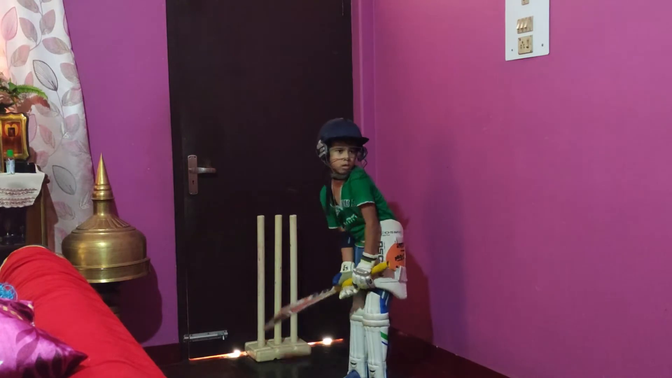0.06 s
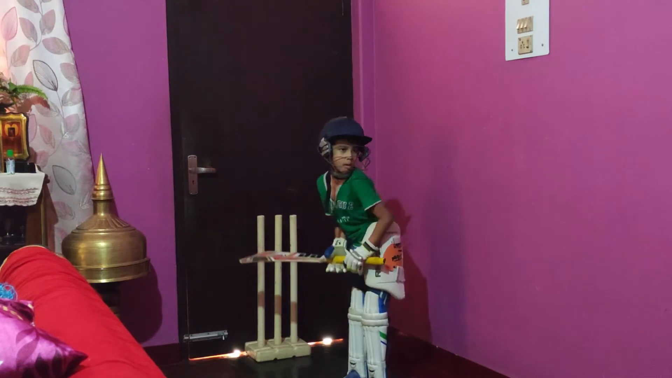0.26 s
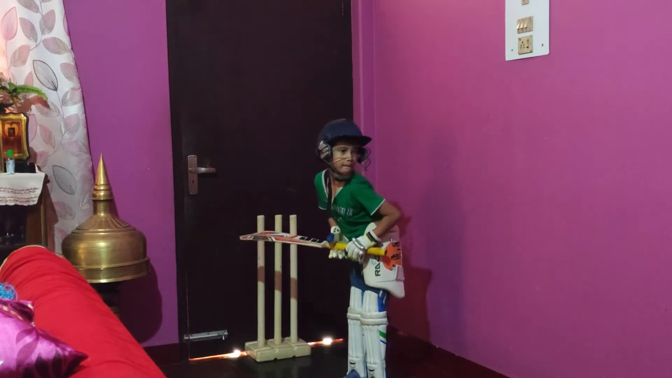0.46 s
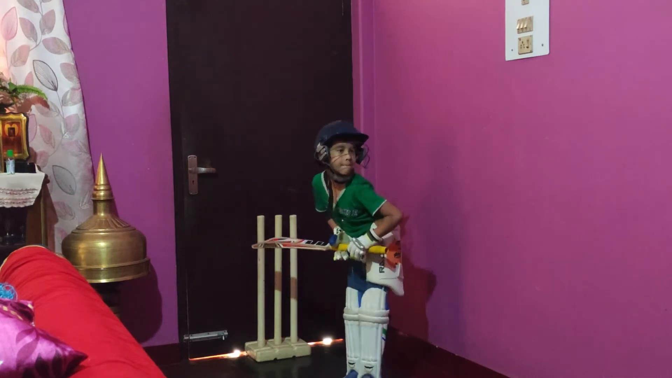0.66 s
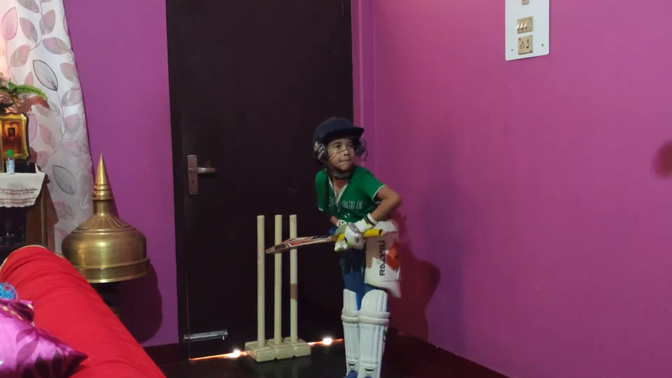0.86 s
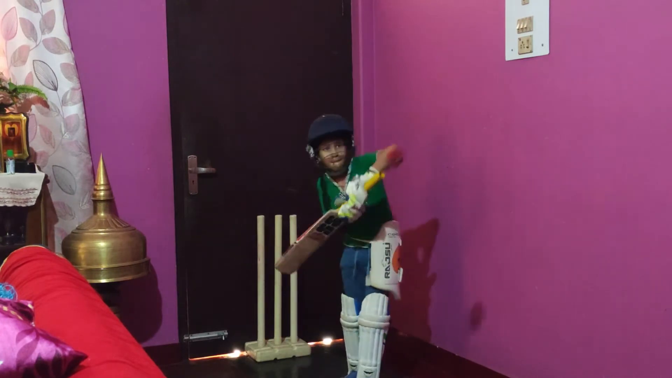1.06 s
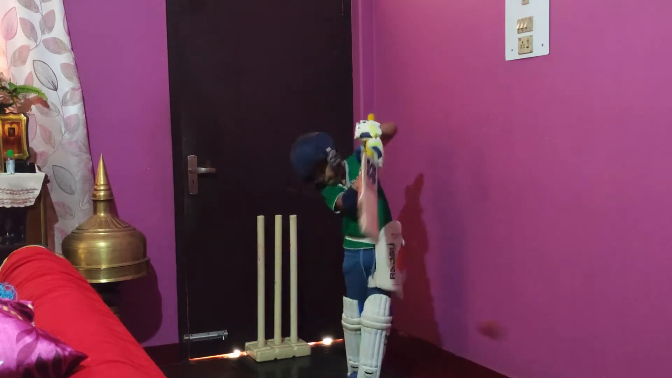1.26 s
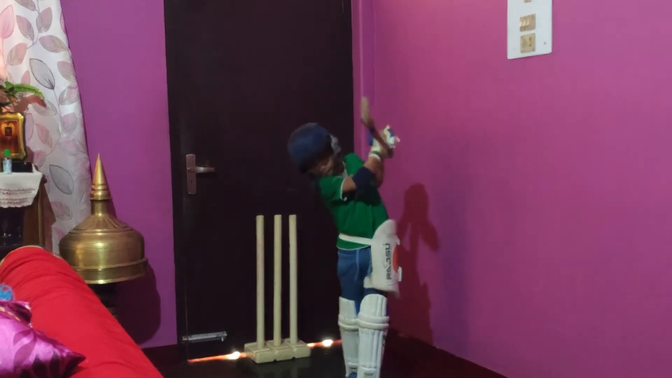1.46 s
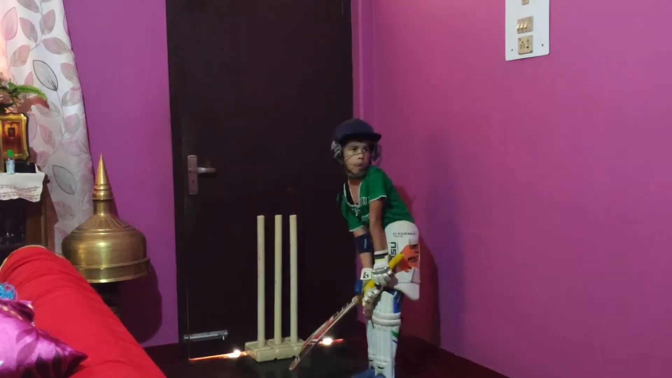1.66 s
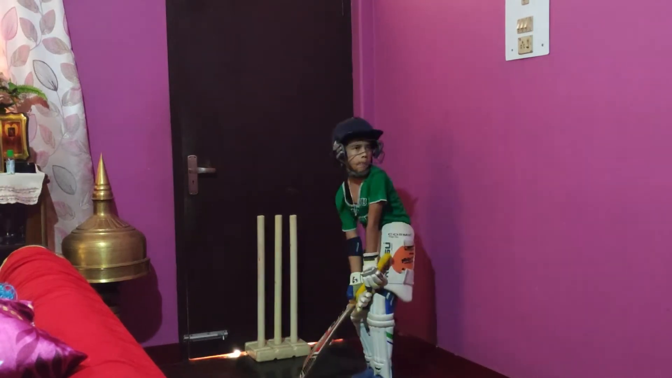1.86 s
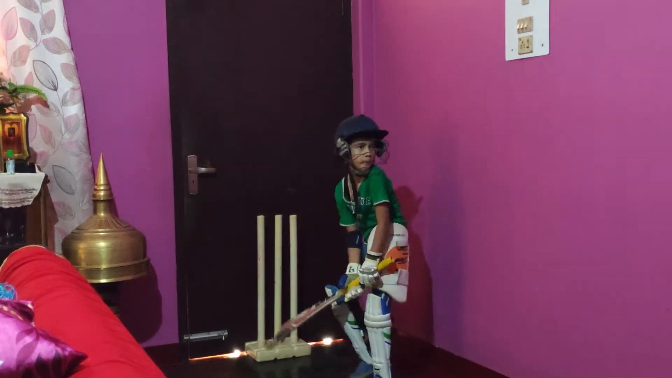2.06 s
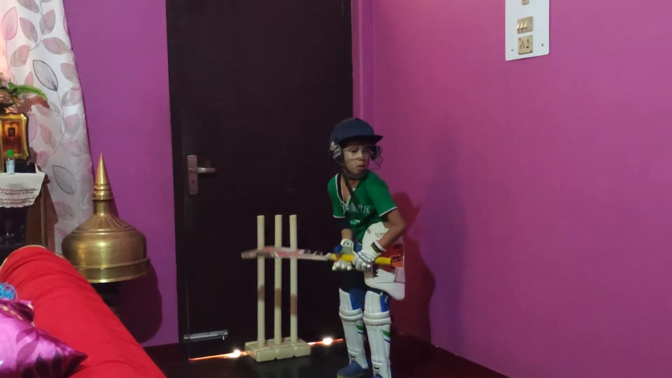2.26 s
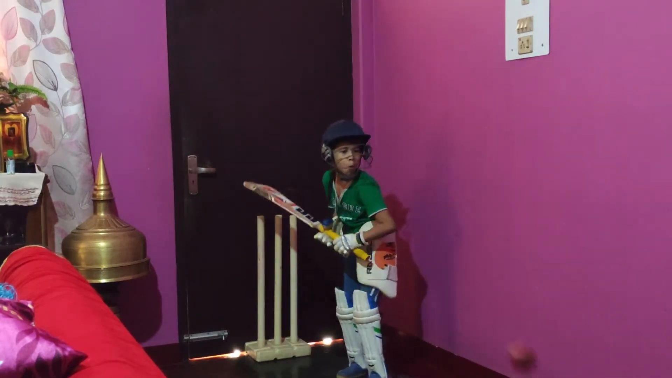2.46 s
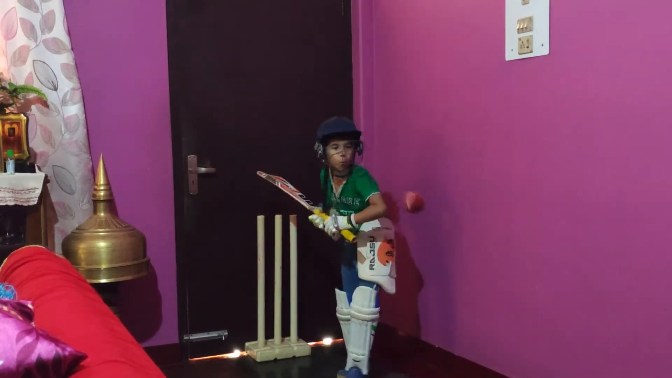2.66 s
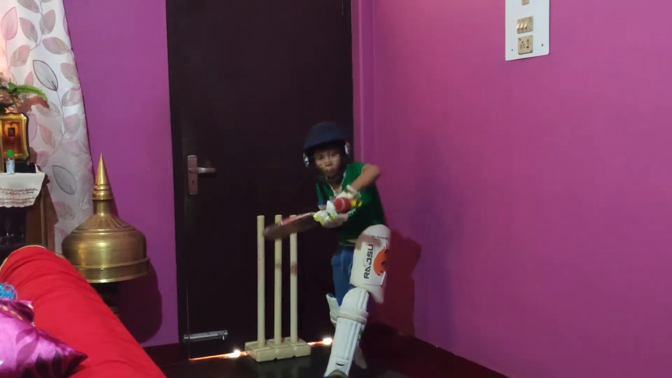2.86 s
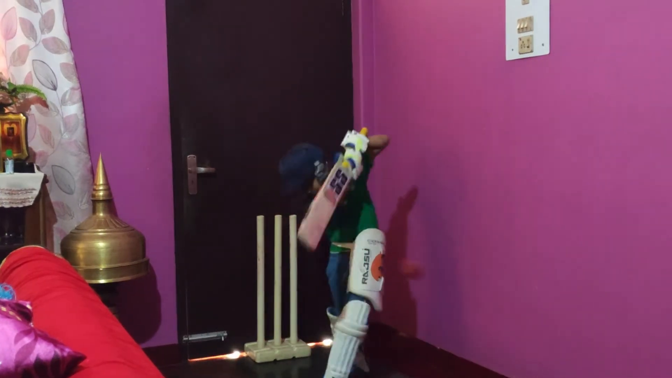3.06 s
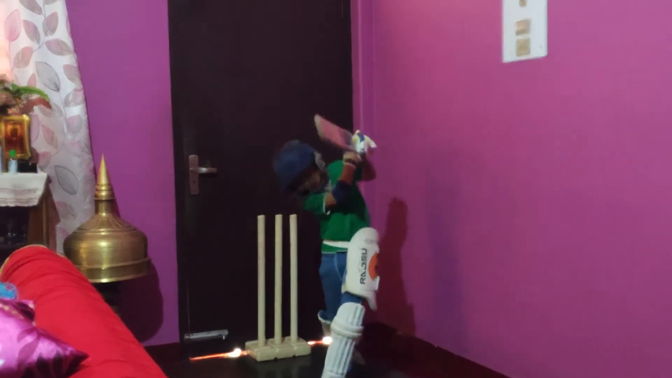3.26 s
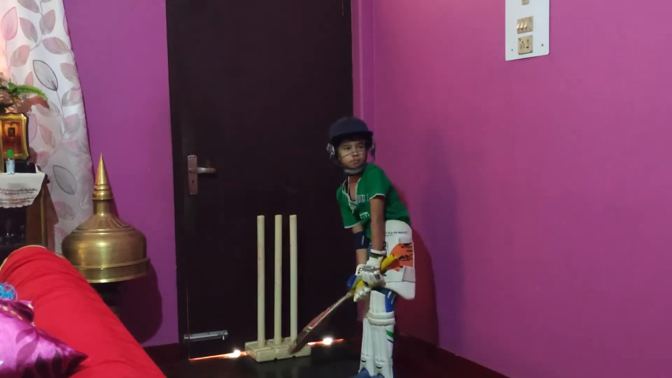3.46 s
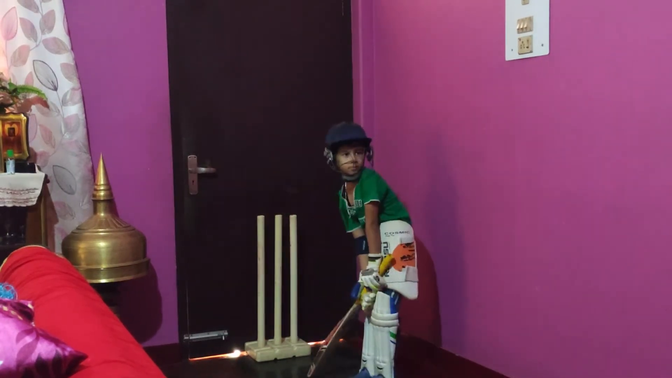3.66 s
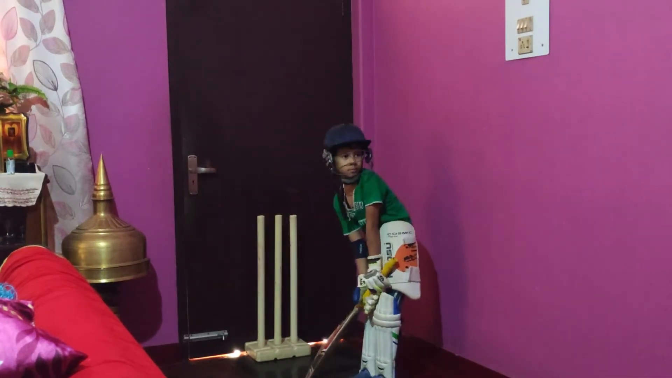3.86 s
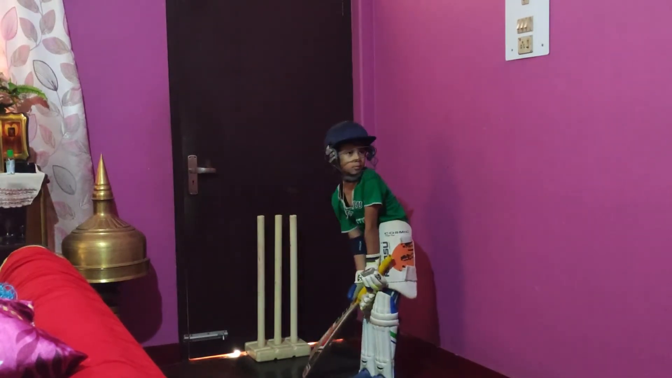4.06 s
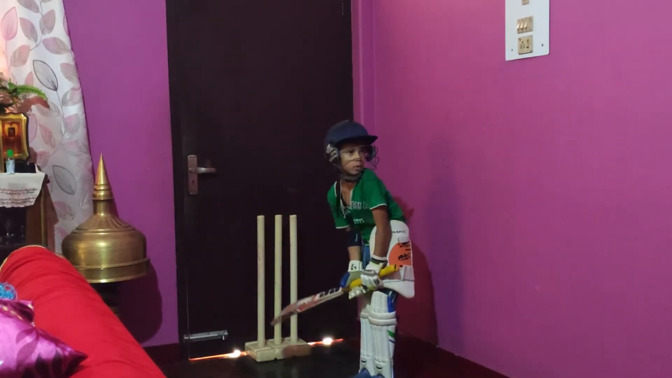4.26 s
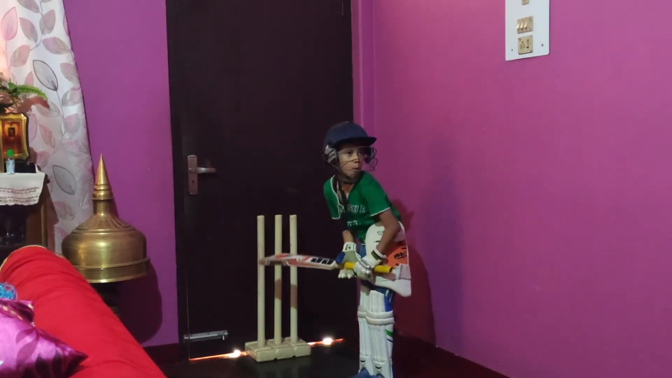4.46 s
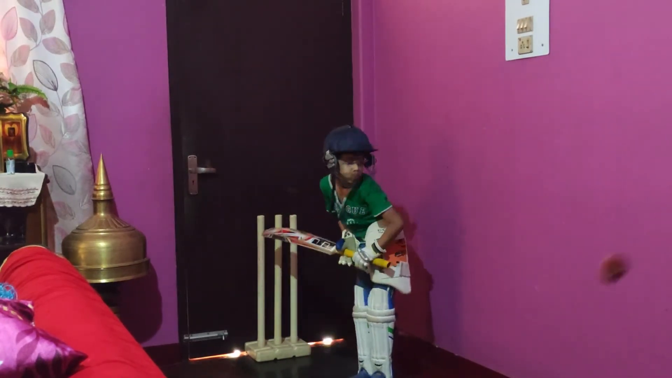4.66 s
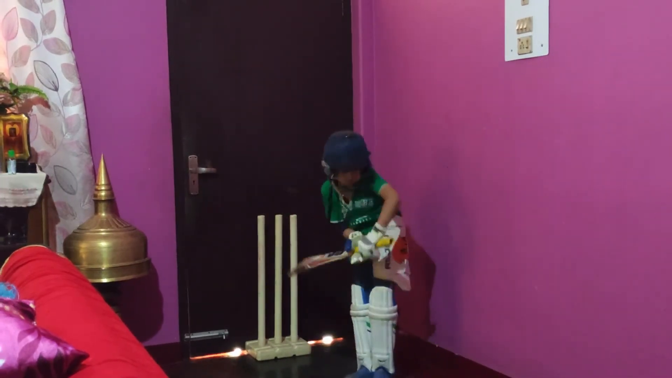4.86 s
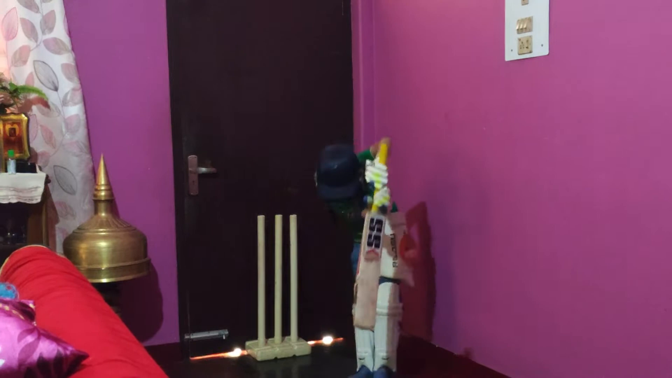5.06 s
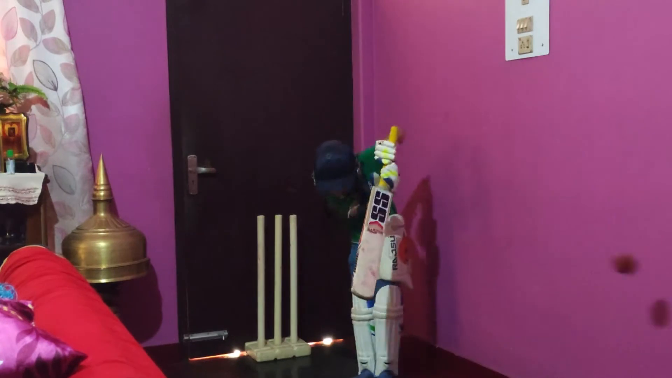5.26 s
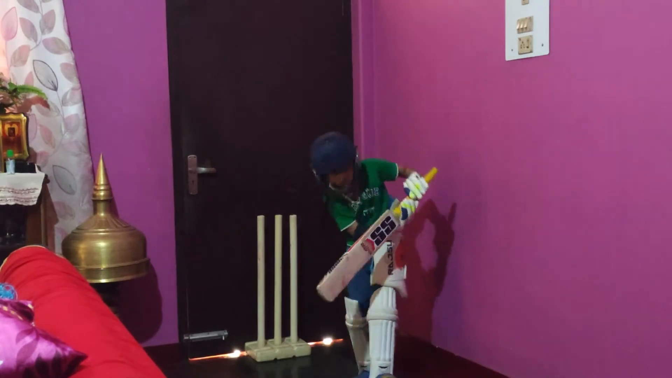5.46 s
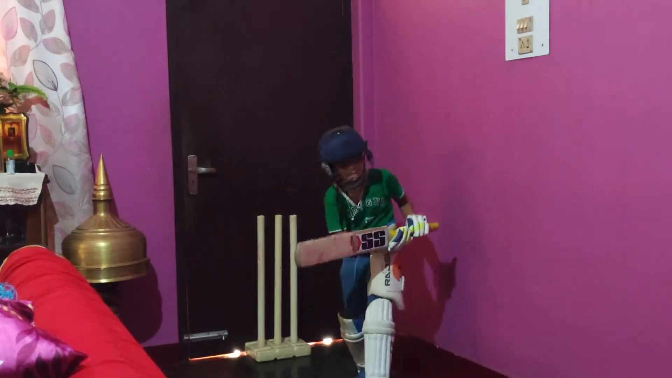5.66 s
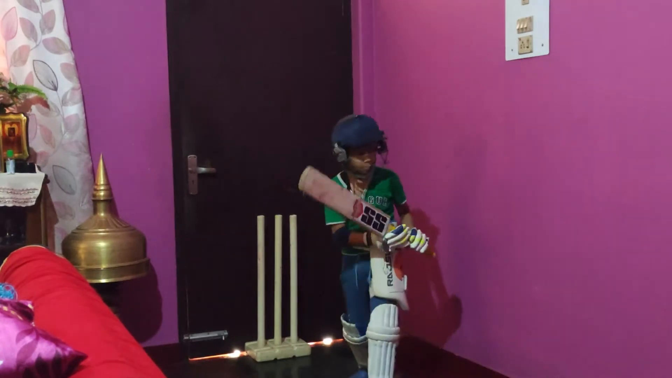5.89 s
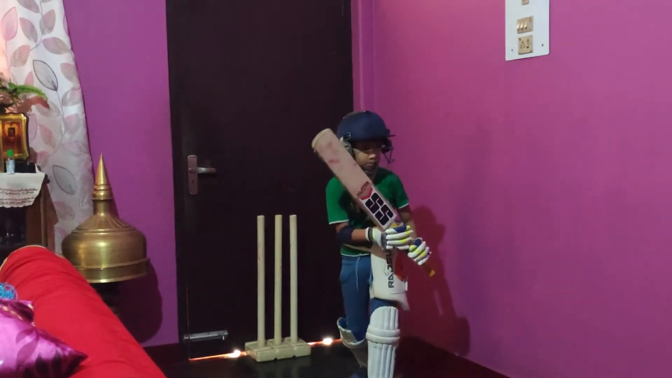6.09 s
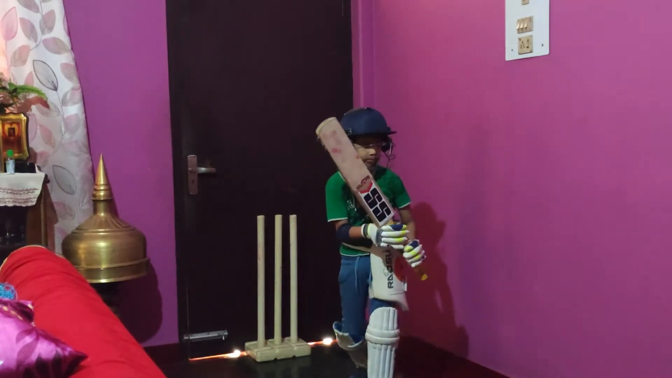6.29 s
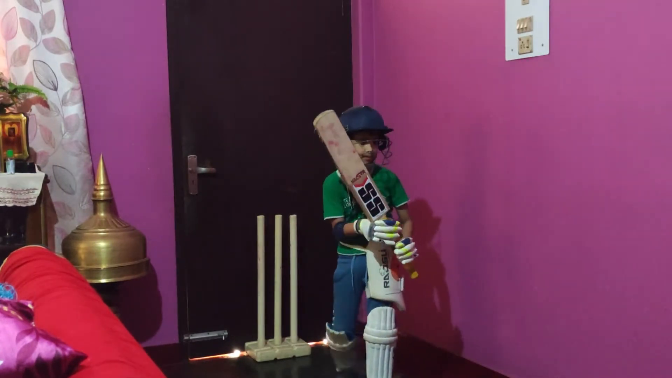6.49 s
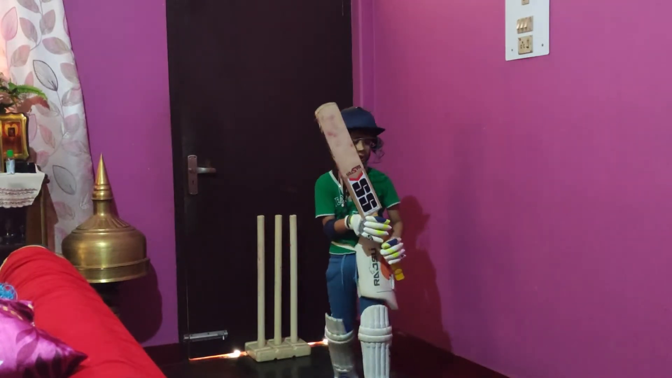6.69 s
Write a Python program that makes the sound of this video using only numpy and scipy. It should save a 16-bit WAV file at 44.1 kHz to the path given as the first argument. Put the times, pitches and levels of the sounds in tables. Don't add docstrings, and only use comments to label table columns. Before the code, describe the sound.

Sharp wooden bat strikes on a bouncing ball, with toe taps on the floor and closing footsteps, echo briefly in a small humming room.

```python
import sys
import numpy as np
from scipy import signal
from scipy.fft import rfft, irfft, next_fast_len
from scipy.io import wavfile
from scipy.ndimage import uniform_filter1d

SR = 44100
rng = np.random.default_rng(int(sys.argv[2]) if len(sys.argv) > 2 else 0)


def voltage_ratio(level):
    return 10 ** (np.asarray(level, float) / 20)


def inscribe(sig):
    pcm = np.round(np.clip(np.atleast_2d(sig).T, -1, 1) * 32767)
    wavfile.write(sys.argv[1], SR, pcm.astype(np.int16))


N = 296793


def evened(x):
    return x / np.sqrt(np.mean(x ** 2) + 1e-20)


def read(points, hz):
    f, value = np.transpose(points)
    return np.interp(np.log(hz + 1), np.log(f + 1), value)


# frequency in Hz, correlation from -1 to 1.
LIKENESS = [(25, 0.99), (60, -0.78), (110, 1), (200, 0.93), (330, 0.69), (640, 0.61), (1400, -0.067),
            (5000, -0.045), (15000, 0.04)]


def diffuse(count, level_db, size=512):
    frames = count * 4 // size + 5
    hz = np.fft.rfftfreq(size, 1 / SR)[:, None]
    a, b, c, d = rng.standard_normal((frames, len(hz), 4)).T
    same = np.clip(read(LIKENESS, hz), -1, 1)
    left = a + 1j * b
    right = same * left + np.sqrt(1 - same ** 2) * (c + 1j * d)
    z = np.array([left, right])
    z *= voltage_ratio(level_db(hz, np.arange(frames) * size / 4 / SR))
    return signal.istft(z, nperseg=size, noverlap=size * 3 // 4)[1][:, :count]


# frequency in Hz, density in dB per Hz.
FAN_COLOUR = [(12, -7), (22, -3), (40, -6), (65, -28), (90, -11.5), (126, -14), (160, -1.5), (230, -2.5),
              (420, -14), (600, -9), (1000, -13.5), (2500, -23.5), (3500, -32.5), (16000, -39)]


def fan():
    level_db, swell_db = -48.5, 0.6
    swell = evened(uniform_filter1d(rng.standard_normal(N // 256 + 5), 30))
    wash = diffuse(N, lambda hz, s: read(FAN_COLOUR, hz) + swell_db * swell, size=1024)
    return voltage_ratio(level_db) * evened(wash)


def hum():
    hum_hz, rms_db = 100.2, -58.5
    return np.sqrt(2) * voltage_ratio(rms_db) * np.sin(2 * np.pi * hum_hz * np.arange(N) / SR)


def drone():
    mode_hz, width_hz, level_db = 102.74, 1.9, -61
    hz = np.fft.rfftfreq(N, 1 / SR)
    spectrum = rfft(rng.standard_normal(N)) / (1 + (2 * (hz - mode_hz) / width_hz) ** 4)
    return voltage_ratio(level_db) * evened(irfft(spectrum, N))


# frequency in Hz, density in dB per Hz.
CLOTH_COLOUR = [(400, 2.5), (900, 0), (1900, 3.5), (3100, -1.5), (6000, -6), (9000, -9.5), (16000, -23)]
# start in seconds, hold in seconds, level in dB, fade in seconds.
SCUFF_EVENTS = [(0.154, .04, -60, 0.35), (0.646, .03, -56, .15), (0.874, .01, -59, 0.062),
                (1.13, 0.086, -59, 0.055), (1.51, 0.025, -48.5, 0.074), (2.64, .05, -66, .15),
                (3.065, .02, -66, .1), (3.38, .02, -60, .12), (3.502, 0.034, -56, 0.18),
                (4.2, .02, -68, .15), (4.84, .02, -63, .1), (5.539, 0.094, -48, 0.5),
                (5.848, 0.073, -72, 0.54), (6.38, 0.055, -76, 0.24), (6.522, .01, -65, 0.053),
                (6.635, .02, -60, .07)]


def movement():
    rise_s, range_db = 0.067, 19.5
    hands_db, shake_db = -62, -4.5
    t = np.arange(N) / SR
    uneven_db = evened(uniform_filter1d(rng.standard_normal(N // 128 + 5), 3))
    rustle = evened(diffuse(N, lambda hz, s: read(CLOTH_COLOUR, hz) + uneven_db, size=512))
    rumble = evened(diffuse(N, lambda hz, s: -((hz - 32) / 6.) ** 2 + 0 * s, size=4096))
    effort = np.zeros(N)
    for start_s, hold_s, level_db, fade_s in SCUFF_EVENTS:
        rising = (start_s - t) / rise_s
        fading = (t - start_s - hold_s) / fade_s
        away = np.maximum(np.maximum(rising, fading), 0)
        effort += voltage_ratio(level_db - range_db * away)
    return rustle * effort + rumble * (voltage_ratio(hands_db) + voltage_ratio(shake_db) * effort)


def pulse(colour, modes, tilt_db, bass_db, modes_db):
    hz = np.fft.rfftfreq(4096, 1 / SR)
    level_db = read(colour, hz) + tilt_db * np.log2(1 + hz / 1500) + bass_db / (1 + (hz / 300) ** 2)
    log_gain = np.log(voltage_ratio(np.maximum(level_db, -100)))
    circle = np.concatenate([log_gain, log_gain[-2:0:-1]])
    dip = np.fft.ifft(np.exp(np.conj(signal.hilbert(circle)))).real
    t = np.arange(len(dip)) / SR
    dip = dip / np.linalg.norm(dip)
    for mode_hz, width_hz, db in modes:
        ring = np.exp(-np.pi * width_hz * t) * np.sin(2 * np.pi * mode_hz * t)
        dip = dip + voltage_ratio(db + modes_db) * ring / np.linalg.norm(ring)
    return -dip / np.linalg.norm(dip)


def arrival(delay_ms, lag_ms, crack_ms):
    hz, t = np.fft.rfftfreq(2048, 1 / SR), np.arange(2048) / SR
    crack = rng.standard_normal((2, len(t))) * np.exp(-t * 1000 / max(crack_ms, .02))
    clean = 1 / (1 + 1j * hz / 3200) ** 2
    rough = np.sqrt(1 - abs(clean) ** 2) * rfft(crack) / np.linalg.norm(crack[0])
    delay_s = (delay_ms + 1 + np.array([[lag_ms], [0]])) / 1000
    return irfft((clean + rough) * np.exp(-2j * np.pi * hz * delay_s))


TAIL = 22000
# frequency in Hz, t60 in seconds.
ROOM_T60 = [(60, 0.67), (260, 0.78), (700, 0.37), (1840, 0.43), (4850, 0.41), (12800, 0.38)]
# frequency in Hz, level in dB, t60 in seconds.
STANDING_WAVES = [(101.5, -0.5, 0.99), (152.3, -11.5, 1), (181.9, -4, 0.97), (266.7, -1, 0.56),
                  (325, -4.5, 0.74)]


def room(paths, wet_db, boom_db, crack_ms, build_ms=6.2):
    t = np.arange(TAIL) / SR
    tail = diffuse(TAIL, lambda hz, s: -60 * s / np.maximum(read(ROOM_T60, hz), .05), size=256)
    tail = tail * (1 - np.exp(-(t * 1000 / build_ms) ** 2))
    tail = tail / np.linalg.norm(tail[0])
    for (hz, db, t60_s), turn in zip(STANDING_WAVES, rng.random(len(STANDING_WAVES))):
        decay = voltage_ratio(boom_db + db - 60 * t / t60_s)
        onset = 1 - np.exp(-t / 0.0061)
        tail = tail + decay * np.sin(2 * np.pi * (hz * t + turn)) * onset
    early = sum(voltage_ratio(db) * arrival(ms, lag_ms, crack_ms) for ms, db, lag_ms in paths)
    out = voltage_ratio(wet_db) * tail
    out[:, :early.shape[1]] += early
    return out


def blows(rows, colour, paths, modes, gain_db, modes_db, boom_db, crack_ms, chatter=None):
    change_s = 1.5082
    no_sub_bass = signal.butter(2, 60, 'high', fs=SR, output='sos')
    chatter = chatter or [(0, 0.01)] * len(rows)
    mix = np.zeros((2, N + TAIL))
    for row, ring, route, (gap_ms, share) in zip(rows, modes, paths, chatter):
        s, level_db, tilt_db, bass_db, wet_db = row
        start = round((s - .001) * SR)
        source = pulse(colour, ring, tilt_db, bass_db, modes_db)
        click = source - uniform_filter1d(source, size=36)
        source = source + share * np.roll(click, round(gap_ms * SR / 1000))
        source = signal.sosfilt(no_sub_bass, source)
        sound = signal.fftconvolve(source[None], room(route, wet_db, boom_db, crack_ms))
        stop = min(round(change_s * SR) - start, TAIL) if s < change_s else TAIL
        mix[:, start:start + stop] += voltage_ratio(level_db + gain_db) * sound[:, :stop]
    return mix[:, :N]


# start in seconds, level in dB, brightness in dB per octave, bass in dB, room share in dB.
STEP_EVENTS = [(.002, -31.5, -9, -16, 1.3), (4.98, -32, 11, -3, 2.8), (5.545, -18, 7.5, 3, 2),
               (5.585, -18.5, -13, 6, 1.3), (5.615, -30, -6, 2, 5.5), (5.695, -31, 1, 5, 2.2),
               (5.94, -32, -1, -18, 5.1), (6.066, -23, 6, 16, 4), (6.12, -28, 1, 2.5, 4),
               (6.19, -39.5, 12, 3, 8.1), (6.7, -32.5, 5, -7, 4.6)]
# frequency in Hz, density in dB per Hz.
STEP_COLOUR = [(18, -56), (30, -16.5), (135, 3.5), (382, -16.5), (428, -12), (490, -20), (749, -16),
               (1360, -35), (3000, -45), (3900, -49), (6600, -120)]
# delay in ms, level in dB, left lag in ms.
STEP_ARRIVALS = [(0, -9, .05), (4., -6, .2), (9., -6, -.2), (15., -7, .1)]
# frequency in Hz, width in Hz, level in dB.
SLAB_MODES = [(82.5, 7.7, 2.5), (126, 34, -11.5)]
SECOND_SLAB_MODES = [(78, 12, 5), (130, 28, -4)]
SCRAPE_MODES = [(610, 140, 6)]


def footsteps():
    modes = [SLAB_MODES] * 6 + [SCRAPE_MODES, SECOND_SLAB_MODES, SECOND_SLAB_MODES, SLAB_MODES, SCRAPE_MODES]
    return blows(STEP_EVENTS, STEP_COLOUR, [STEP_ARRIVALS] * len(STEP_EVENTS), modes,
                 gain_db=14.0, modes_db=-5.5, boom_db=-58.0, crack_ms=3.8)


# start in seconds, level in dB, brightness in dB per octave, bass in dB, room share in dB.
BOUNCE_EVENTS = [
    (1.4855, -25.5, 1.5, 12, 11.5),
    (2.4121, -22.5, 0, -5.5, 6.8),
    (3.5225, -39.5, 3, -8, 1.6),
    (4.879, -40.5, -1, -6, 1.1),
    (4.9329, -19, 1, -0.5, 3.5),
    (5.762, -38, -2, 5, 1),
    (6.2, -55.5, 7, -4, 1),
]
# frequency in Hz, density in dB per Hz.
BOUNCE_COLOUR = [(30, -41), (70, -2), (170, 4), (430, -8.5), (700, -8.5), (1200, -4), (2500, -15),
                 (4700, -25), (8000, -25), (16000, -50)]
# delay in ms, level in dB, left lag in ms.
BOUNCE_ARRIVALS = [(0, -2, 0.27), (2.1, -5.5, 0.26), (6.2, -3, 0.265), (10.9, -16, 0.05), (12.5, -19, 0.11)]
# frequency in Hz, width in Hz, level in dB.
SURFACE_MODES = [
    [(5000, 2000, -5), (2500, 1800, -19)],
    [(1140, 340, -1)],
    [(1440, 320, 11)],
    [(1460, 200, 19)],
    [(1370, 110, -5.5), (204, 110, -0.5)],
    [],
    [],
]


def bounces():
    return blows(BOUNCE_EVENTS, BOUNCE_COLOUR, [BOUNCE_ARRIVALS] * len(BOUNCE_EVENTS), SURFACE_MODES,
                 gain_db=18., modes_db=-5., boom_db=-54., crack_ms=.3)


# start in seconds, level in dB, brightness in dB per octave, bass in dB, room share in dB.
TAP_EVENTS = [
    (1.5575, -13, -0.5, -1, 7.1),
    (1.908, -22.5, 5, 3.2, 9.8),
    (3.661, -16, 1, -1.7, 8.1),
    (3.9641, -23, -6, -1.5, 7.2),
    (4.091, -43, 10, -8, 4.5),
]
# frequency in Hz, density in dB per Hz.
TAP_COLOUR = [(30, -51), (70, -7.5), (170, 2), (300, -2.5), (480, -7), (700, -1), (1100, -11.5),
              (2000, -25), (4000, -39), (8000, -53), (16000, -63)]
# delay in ms, level in dB, left lag in ms.
TAP_ARRIVALS = [(0, 0, .02), (1.75, 4, .2), (6.4, -8, .35), (8.9, -8, -.3), (11.7, -1, -.05), (14., -3, .2)]
# frequency in Hz, width in Hz, level in dB.
TOE_RINGS = [
    [(690, 190, 5.5), (860, 170, -16), (1630, 430, -12), (2480, 400, -23)],
    [(572, 83, -1), (1150, 280, -6), (1670, 78, -12), (3550, 280, -29)],
    [(690, 260, 4), (1400, 200, -6), (2100, 160, -12), (2900, 180, -16), (3750, 180, -19), (4500, 150, -21),
     (5200, 150, -23), (6000, 200, -31), (7500, 400, -36)],
    [(587, 370, -1.5), (1220, 210, -4.5), (1550, 110, -12)],
    [],
]
# gap in ms, share of the blow.
TOE_CHATTER = [(1.7, 0.067), (1.7, 0.26), (1.347, 0.25), (1.7, 0.19), (1.2, .2)]


def taps():
    return blows(TAP_EVENTS, TAP_COLOUR, [TAP_ARRIVALS] * len(TAP_EVENTS), TOE_RINGS,
                 gain_db=17.5, modes_db=-8., boom_db=-52., crack_ms=1.5, chatter=TOE_CHATTER)


# start in seconds, level in dB, brightness in dB per octave, bass in dB, room share in dB.
STRIKE_EVENTS = [
    (1.2751, -9, 3.5, -7.5, 6.5),
    (3.0962, -10, 0.5, -3.5, 4),
    (5.109, -13.5, -1, -5.5, 5.5),
]
# frequency in Hz, density in dB per Hz.
STRIKE_COLOUR = [(30, -26), (60, 6.5), (110, 5.5), (300, 2), (480, -16.5), (760, 0.5), (1500, 1.5),
                 (2700, -5), (4500, -16), (8000, -19), (16000, -49)]
# delay in ms, level in dB, left lag in ms.
STRIKE_ARRIVALS = [
    [(0, 0.1, .02), (2.6, -3., .2), (5.2, -7., -.2), (7.4, 1., .3), (9.8, -3., -.1), (13.3, -6., -.2)],
    [(0, 0.1, .02), (2.5, -2., -.2), (5., -8., .2), (7.2, -2., .2), (9., -2., .3), (13.3, -7., .1)],
    [(0, -4., .02), (1.6, 3.5, .1), (4.5, -8., .1), (7.3, -3., .2), (10.2, -6., .1), (13., -7., -.2)],
]
# frequency in Hz, width in Hz, level in dB.
BLADE_MODES = [
    [(840, 360, -0.5), (1340, 120, -5), (1675, 130, 4), (2390, 150, -6), (5760, 300, -10)],
    [(844, 120, 0), (1090, 520, -7), (1610, 150, -2), (3770, 200, -10), (4900, 320, -5.5),
     (6400, 500, -8.5)],
    [(850, 62, -3), (1260, 300, -20), (1860, 89, 3), (2660, 280, 3), (3520, 370, -2)],
]


def strikes():
    return blows(STRIKE_EVENTS, STRIKE_COLOUR, STRIKE_ARRIVALS, BLADE_MODES,
                 gain_db=15.5, modes_db=-12.5, boom_db=-56.5, crack_ms=2.6)


def scene():
    background = fan() + hum() + drone() + movement()
    return background + footsteps() + bounces() + taps() + strikes()


def low_pass(x):
    return signal.sosfilt(signal.butter(12, 16460, fs=SR, output="sos"), x)


# frequency in Hz, gain in dB.
MIC_RESPONSE = [(4000, -1.22), (6000, -2), (7500, 3.5), (8300, -3.5), (9200, -7), (11000, -7),
                (15700, -6.5), (16100, -35)]
# frequency in Hz, left minus right in dB.
PORT_MISMATCH = [(60, -2), (99, 1.5), (160, 1.0), (270, 0), (450, 0), (740, 2.5), (1220, -1), (2010, 0),
                 (3330, -3), (5500, -3), (9080, 4), (15000, -6.5)]


def record(dry):
    size = next_fast_len(N)
    hz = np.fft.rfftfreq(size, 1 / SR)
    colour_db = read(MIC_RESPONSE, hz) + np.outer([.5, -.5], read(PORT_MISMATCH, hz))
    mix = irfft(rfft(dry, size) * voltage_ratio(colour_db), size)[:, :N]
    return low_pass(mix)


dry = scene()
out = record(dry)
inscribe(out)
```